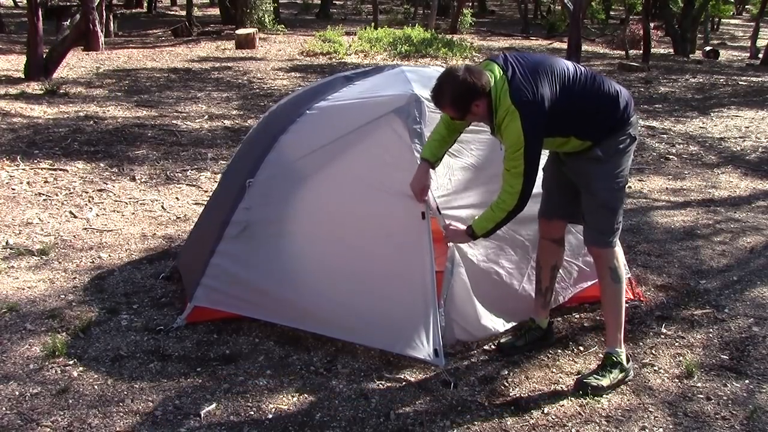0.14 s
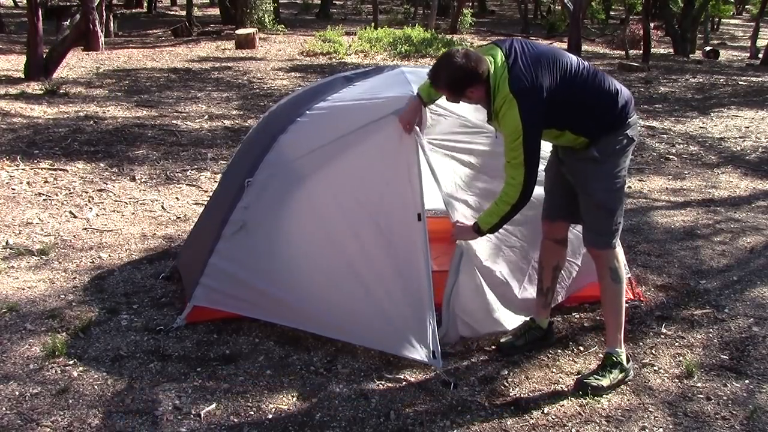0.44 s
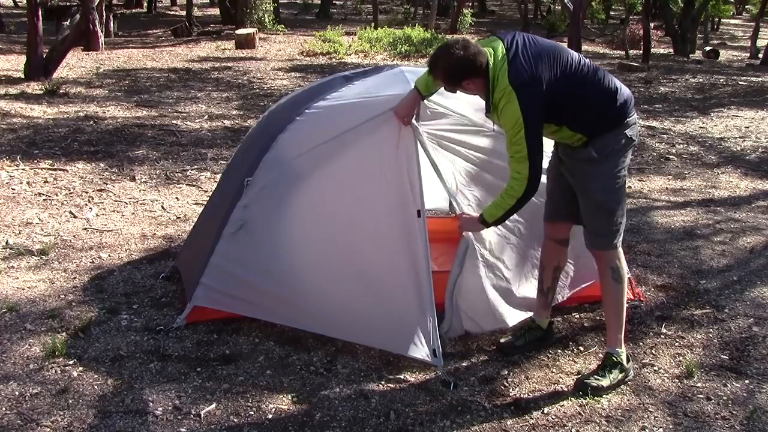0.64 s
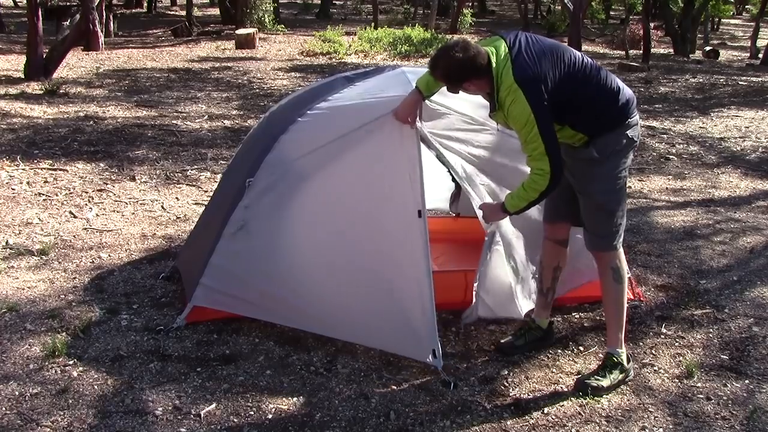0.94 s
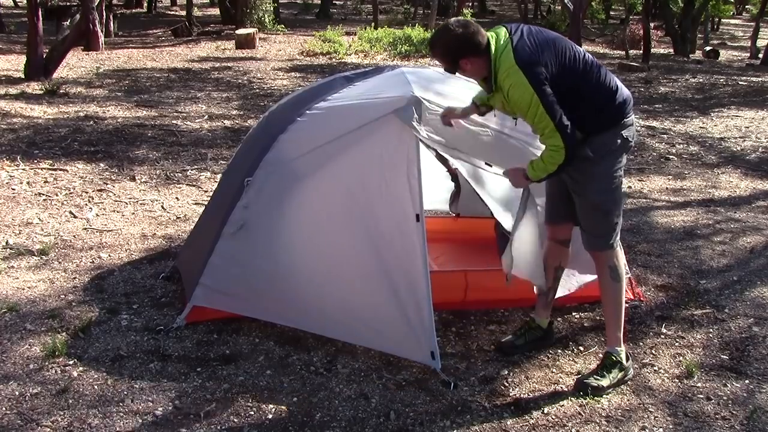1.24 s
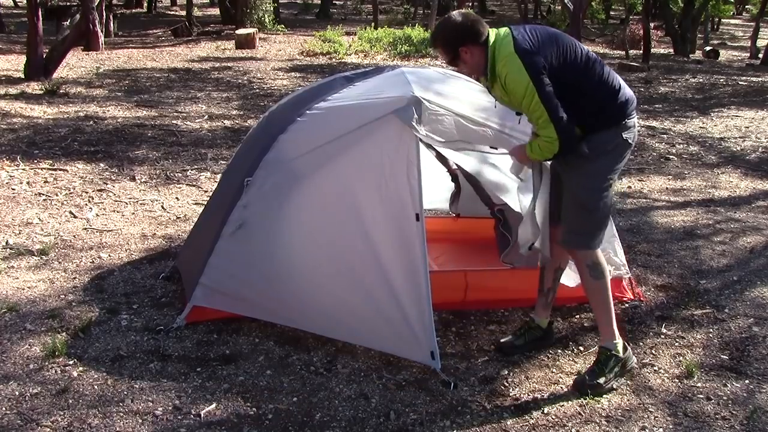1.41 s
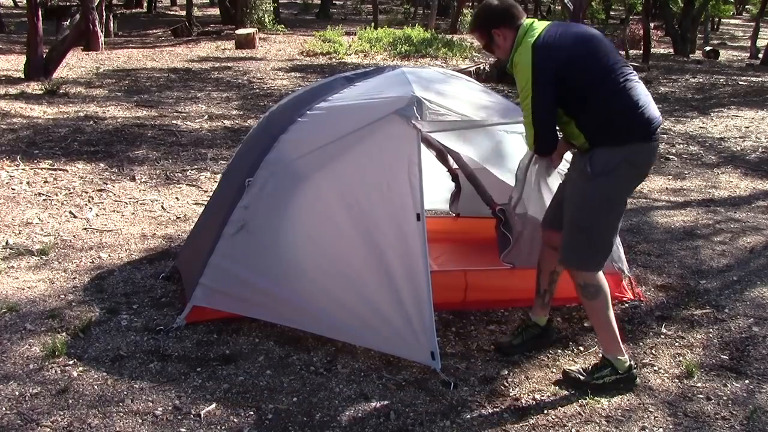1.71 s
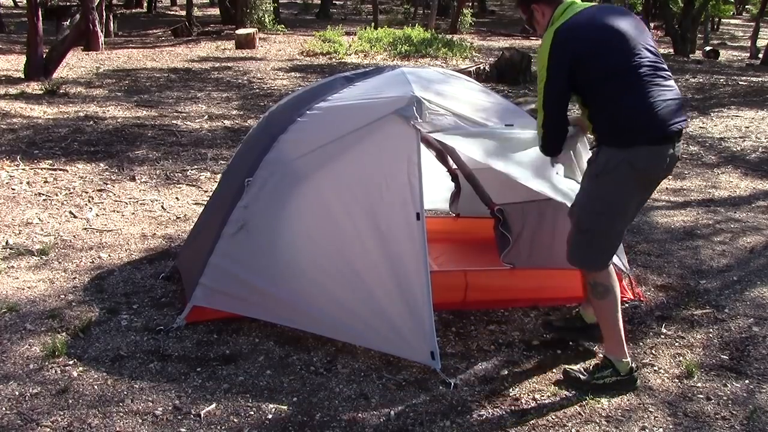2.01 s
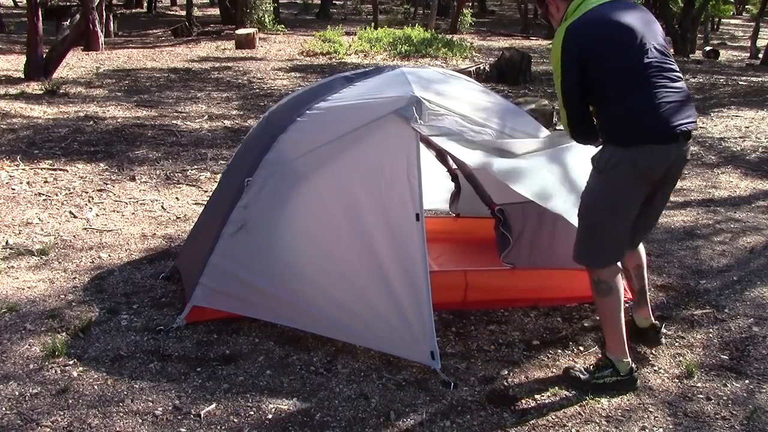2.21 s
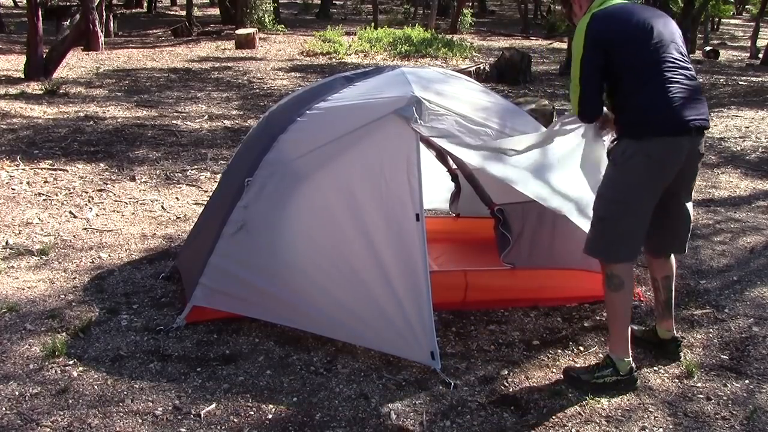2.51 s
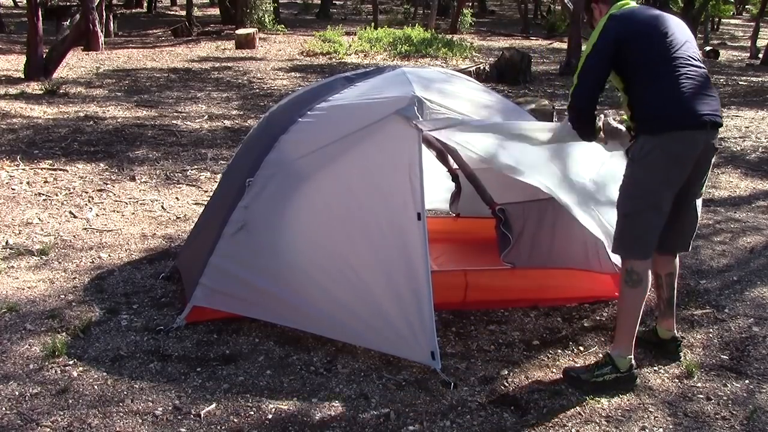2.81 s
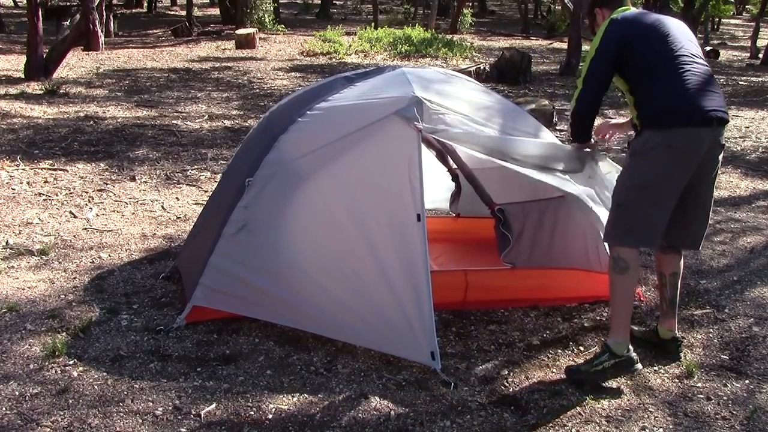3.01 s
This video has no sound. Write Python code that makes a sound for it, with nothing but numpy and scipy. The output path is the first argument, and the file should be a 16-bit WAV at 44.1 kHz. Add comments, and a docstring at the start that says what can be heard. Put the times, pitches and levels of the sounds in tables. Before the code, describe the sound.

A tent zipper opens in one quick pull: faint cloth touches and a small scrape around 0.2 seconds, then a buzzing, toothy zip rising in pitch and wavering until 0.6. Soft nylon rustles and small flaps follow until 1.5. Then the flap is gathered busily, with swishes, crinkles, hard rubs, dull flaps and sharp snaps, loudest from 2 seconds to the end. Quiet outdoor air, slight hiss, dull treble.

```python
"""A tent door is unzipped in one quick pull: the slider scrapes as it starts, then ticks over the teeth, and the
taut panel sings at their rate. The nylon flap is then gathered and folded back; loose cloth swishes, crinkles
and billows. Now and then nylon rubs hard, a pull sets it sliding, a fold flaps taut or a crease snaps.
Still air and faint scatter from the trees surround it. The microphone is dull above 6.6 kHz, over a little hiss."""
import sys
import numpy as np
from scipy import signal
from scipy.fft import rfft, irfft
from scipy.io import wavfile
from scipy.ndimage import uniform_filter1d

SR = 44100
rng = np.random.default_rng(int(sys.argv[2]) if len(sys.argv) > 2 else 0)


def master_out(mix):
    """Clip the mix to full scale and print it as 16-bit PCM to the path in sys.argv[1]."""
    frames = np.transpose(np.atleast_2d(mix))
    ceiling = np.clip(frames, -1, 1)
    pcm = np.round(ceiling * 32767).astype(np.int16)
    wavfile.write(sys.argv[1], SR, pcm)


N = 138915  # samples, 3.15 s


def undb(db):
    """Decibels to gain."""
    return 10 ** (np.asarray(db) / 20)


def unit(x):
    """Scale to rms 1."""
    return x / np.sqrt(np.mean(x ** 2))


def lowpass(x, order, hz):
    """Butterworth filter that dulls the sound above hz."""
    return signal.sosfilt(signal.butter(order, hz, fs=SR, output="sos"), x)


def highpass(x, order, hz):
    """Butterworth filter that thins the sound below hz."""
    return signal.sosfilt(signal.butter(order, hz, "high", fs=SR, output="sos"), x)


def bandpass(x, order, low_hz, high_hz):
    """Butterworth filter that keeps the band between two frequencies."""
    return signal.sosfilt(signal.butter(order, [low_hz, high_hz], "band", fs=SR, output="sos"), x)


def colour(x, points):
    """Causal, minimum-phase filter through (f/Hz, level/dB) points; the result has rms 1."""
    hz, db = np.array(points).T
    size = 2048
    log_f = np.log(np.fft.rfftfreq(size, 1 / SR) + 1)
    log_gain = np.interp(log_f, np.log(hz), db) * np.log(10) / 20
    # fold the cepstrum onto positive time, so nothing rings ahead of the sound
    cepstrum = irfft(log_gain)
    cepstrum[1:size // 2] *= 2
    cepstrum[size // 2 + 1:] = 0
    impulse = irfft(np.exp(rfft(cepstrum)))
    return unit(signal.fftconvolve(x, impulse)[:N])


def envelope(rows, axis, fade_s=0.015):
    """Gain from one dB column of a curve, dying away outside it."""
    rows, t = np.array(rows), np.arange(N) / SR
    outside = np.abs(t - np.clip(t, rows[0, 0], rows[-1, 0]))
    return undb(np.interp(t, rows[:, 0], rows[:, axis])) * np.exp(-outside / fade_s)


def walk(rate):
    """Random wander through `rate` straight-line steps a second, rms 1."""
    knots = rng.standard_normal(N)
    return unit(np.interp(np.arange(N) / SR * rate, np.arange(N), knots))


def grains(rate, spread_db, smooth):
    """Tiny clicks of scattered size, `rate` a second, over a share of smooth friction noise."""
    chance, size, sign = rng.random(N), rng.standard_normal(N), rng.choice([-1, 1], N)
    clicks = (chance < rate / SR) * sign * undb(spread_db * np.clip(size, -2, 2))
    return unit(clicks) + smooth * rng.standard_normal(N)


def burst(start, decay_s):
    """Noise that starts at once and dies away."""
    age = np.arange(N) / SR - start
    fade = np.exp(-np.minimum(np.abs(age) / decay_s, 20))
    return (age >= 0) * fade * rng.standard_normal(N)


# tone colour of the still air: f/Hz, level/dB (relative)
AIR_COLOUR = [(25, -25), (70, -15), (160, 18), (400, -1), (1000, -12), (7000, -15), (15000, 0.5)]
AIR_DB = -55


def still_air():
    """Still air among the trees: steady coloured noise."""
    return undb(AIR_DB) * colour(rng.standard_normal(N), AIR_COLOUR)


WOOD_DELAY_S, WOOD_DECAY_S, WOOD_DB = 0.019, 0.025, -24


def trees(tent):
    """The trees scatter the sound back as a faint, late wash of tiny echoes."""
    echoes = unit(burst(WOOD_DELAY_S, WOOD_DECAY_S)) / np.sqrt(N)  # unit energy
    return undb(WOOD_DB) * signal.fftconvolve(tent, echoes)[:N]


# sizes of crease, as the pitch of each one's tick: f/Hz
CREASE_PITCHES = [700, 1100, 1600, 2200, 3200, 5000]


def creases():
    """Small creases buckle at random, each with a tick at the pitch of its own size."""
    return sum(bandpass(grains(220, 3.5, .4), 2, hz / 1.5, hz * 1.5) for hz in CREASE_PITCHES)


PATCHY_DB, PATCHY_RATE = 2.3, 75  # rms swing of each band; steps per second


def patchy(x):
    """The folds keep changing shape, so each half-octave swells and fades on its own."""
    octave = np.log2(np.fft.rfftfreq(N, 1 / SR) + 1)
    centres = np.arange(9, 13.5, .5)  # log2 Hz: 512 Hz to 8.2 kHz
    spectrum, out = rfft(x), 0
    for weights in np.eye(len(centres)):
        band = irfft(spectrum * np.interp(octave, centres, weights), N)
        out = out + band * undb(PATCHY_DB * walk(PATCHY_RATE))
    return unit(out)


# cloth effort in three stretches, levels before the trims below:
# t/s, swish level/dB, crinkle level/dB, billow level/dB
GRIP_EFFORT = [(0, -50, -60, -68), (.02, -56, -48.5, -54), (.05, -88, -72, -76), (.125, -63, -76, -72),
               (.155, -50.5, -61, -38.5), (.19, -48.5, -67, -30), (.21, -41.5, -48, -31),
               (.265, -38, -30, -34.5)]  # before and into the pull
FOLD_EFFORT = [(0.58, -38, -29, -33.5), (0.66, -35.5, -46, -34), (0.715, -51.5, -43, -44),
               (0.82, -64, -57.5, -55.5), (1.006, -54.5, -46, -47.5), (1.074, -61, -45.5, -33.5),
               (1.105, -69, -56, -48.5), (1.15, -48.5, -43, -45.5), (1.205, -54, -44.5, -40),
               (1.278, -54.5, -44, -48), (1.322, -35, -35, -29), (1.344, -41, -34, -41),
               (1.39, -35.5, -47, -40.5), (1.51, -48.5, -40.5, -45)]  # after the pull
GATHER_EFFORT = [(1.51, -64, -60, -56), (1.528, -31.5, -37, -27), (1.605, -30.5, -32, -32.5),
                 (1.65, -36.5, -33.5, -43), (1.674, -34.5, -29, -35), (1.738, -51, -29.5, -34),
                 (1.76, -36, -25.5, -28), (1.856, -30, -28.5, -31.5), (1.912, -35.5, -32.5, -26.5),
                 (1.938, -30, -25.5, -22.5), (2.026, -28.5, -20.5, -28.5), (2.052, -18, -20.5, -22),
                 (2.09, -24, -21, -27.5), (2.282, -23, -20.5, -26), (2.322, -27.5, -24.5, -32.5),
                 (2.436, -30, -25.5, -41), (2.486, -23, -18.5, -26), (2.578, -26, -27.5, -42),
                 (2.638, -16.5, -19.5, -30), (2.66, -26.5, -25, -30), (2.706, -32, -26, -42.5),
                 (2.742, -24, -17, -21), (2.774, -30.5, -23.5, -23), (2.808, -54, -32, -36),
                 (2.838, -60, -38, -39.5), (2.882, -37.5, -28.5, -37.5), (2.902, -25, -38, -23.5),
                 (2.934, -28.5, -26, -43.5), (3.022, -23.5, -13, -29.5), (3.062, -27, -28, -32.5),
                 (3.108, -55, -28.5, -49), (3.15, -20, -22, -43)]  # the busier handling that follows
# tone colours of the three cloth voices: f/Hz, level/dB (relative)
SWISH_COLOUR = [(500, -31), (1500, -5.5), (3200, -1.5), (5000, -1.5), (6500, 0), (15000, -2.5)]
CRINKLE_COLOUR = [(300, -22.5), (700, -1), (1000, 3), (1300, -2.5), (1900, 4.5), (3000, -4), (6000, -12),
                  (12000, -27)]
BILLOW_COLOUR = [(30, -85), (60, -18), (120, -4), (250, 1), (400, 3.5), (600, -1), (900, -8.5), (1600, -11),
                 (5000, -82)]
SWISH_DB, CRINKLE_DB, BILLOW_DB = 5.5, -6, 0  # trims


def cloth():
    """Nylon slides over itself, small creases buckle and the loose panel billows."""
    after_pull = list(FOLD_EFFORT) + list(GATHER_EFFORT)

    def effort(axis):
        """The stronger of the handling before and after the pull."""
        return np.maximum(envelope(GRIP_EFFORT, axis=axis), envelope(after_pull, axis=axis))

    swish = patchy(colour(grains(3500, 5, .8) * undb(1.6 * walk(180)), SWISH_COLOUR))
    crinkle = patchy(colour(creases() * undb(1.5 * walk(90)), CRINKLE_COLOUR))
    billow = colour(grains(320, 3, .5), BILLOW_COLOUR)
    out = undb(SWISH_DB) * swish * effort(axis=1)
    out = out + undb(CRINKLE_DB) * crinkle * effort(axis=2)
    return out + undb(BILLOW_DB) * billow * effort(axis=3)


# scrapes and hard rubs: the slider scraping as the zip starts (first two rows), later nylon dragged over nylon:
# middle t/s, half length t/s (to 1/e), pitch f/Hz, level/dB at the middle
SCRAPES_AND_RUBS = [(0.17, 0.014, 1460, -38), (0.25, 0.048, 1110, -29), (1.44, 0.087, 990, -38.5),
                    (2.377, 0.049, 3360, -29), (2.473, 0.048, 3800, -23), (2.635, 0.043, 2040, -22.5)]
SCRAPE_WIDTH = .24  # band edges, as a share of the pitch either side


def scrapes_and_rubs():
    """Rough contact, slider or taut nylon, sticks and slips in a short, ringing band of friction noise."""
    t, out = np.arange(N) / SR, 0
    for middle, length, hz, db in SCRAPES_AND_RUBS:
        friction = grains(1500, 4.5, 0.3)
        scrape = unit(bandpass(friction, 2, hz / (1 + SCRAPE_WIDTH), hz * (1 + SCRAPE_WIDTH)))
        out = out + undb(db) * scrape * np.exp(-((t - middle) / length) ** 2)
    return out


# sudden pulls on the cloth: t/s, starting level/dB (before the band filter)
SUDDEN_PULLS = [(0.204, -25), (1.412, -31), (1.523, -23.5), (1.994, -18), (2.887, -14.5)]
TUG_DECAY_S, TUG_LOW_HZ, TUG_HIGH_HZ = 0.04, 150, 2170


def tugs():
    """A sudden pull sets the cloth sliding at once; the rasp then dies away."""
    slide = sum(undb(db) * burst(start, TUG_DECAY_S) for start, db in SUDDEN_PULLS)
    return bandpass(slide, 1, TUG_LOW_HZ, TUG_HIGH_HZ)


# folds flapping taut: t/s at the pulse's middle, peak level/dB of the pulse, pitch f/Hz
TAUT_FOLDS = [(.656, -15, 401), (.668, -24, 450), (.681, -24, 298), (.69, -21.5, 367), (.706, -27, 480),
              (.725, -26, 513), (.771, -29, 460), (.924, -32, 543), (1.041, -25.5, 380), (1.07, -29.5, 480),
              (1.216, -36, 400), (1.295, -22.5, 385), (1.535, -13, 493), (1.677, -18, 404),
              (1.935, -27, 453), (2.047, -7, 233), (2.743, -13.5, 178), (2.777, -5, 430),
              (2.983, -18.5, 268)]
FLUTTER_DECAY_S, FLUTTER_DB = 0.004, -12  # flutter gain relative to the pulse


def flaps():
    """A fold jerks taut: one dull pressure pulse, then a brief flutter."""
    t, out = np.arange(N) / SR, 0
    for middle, db, hz in TAUT_FOLDS:
        u = np.minimum((np.pi * hz * (t - middle)) ** 2, 20)
        pulse = (2 * u - 1) * np.exp(-u)
        flutter = burst(middle, FLUTTER_DECAY_S)
        for _ in range(2):
            flutter = bandpass(flutter, 1, hz / 2, hz * 2)
        flutter = flutter * np.sqrt(SR / hz) / 2  # makes up for the narrower band of a low flap
        out = out + undb(db) * (pulse + undb(FLUTTER_DB) * flutter)
    return out


# creases snapping: t/s, ring level/dB, pitch f/Hz, spray level/dB (relative to the ring, before its filter and lift)
SNAPPING_CREASES = [(0.611, -25.5, 1095, -18), (.893, -38, 1600, -9), (1.123, -35, 1800, -8),
                    (1.158, -26.5, 1160, -16), (1.183, -23.5, 1830, -19), (1.308, -24, 2300, -12),
                    (1.324, -20.5, 1350, 1.5), (1.409, -26, 1040, 1.5), (1.533, -14.5, 2400, -11),
                    (1.62, -15.5, 1410, -12), (1.7, -13, 1940, -12), (1.787, -16.5, 1220, -7),
                    (2.066, -16, 3000, -4), (2.111, -11.5, 1920, -6.5), (2.277, -5.5, 2100, -5.5),
                    (2.416, -9.5, 3990, -25), (2.48, -7, 2660, -10), (2.527, -4, 3070, -12),
                    (2.684, -3, 2020, -26), (2.695, -11, 2000, -6), (2.796, -21.5, 890, 2),
                    (2.855, -25.5, 1050, -10), (2.902, -9.5, 1210, -4), (2.949, -15.5, 2070, -11)]
SNAP_CYCLES, SPRAY_DECAY_S, SPRAY_HZ = .75, .0025, 5000  # ring half length in cycles; spray decay and low-pass


def snaps():
    """A crease pops through: a cycle or two of ring and a short spray of crackle."""
    t, rings, spray = np.arange(N) / SR, 0, 0
    for start, db, hz, spray_db in SNAPPING_CREASES:
        cycles = (t - start) * hz
        swell = np.exp(-np.minimum((cycles / SNAP_CYCLES - 1) ** 2, 20))
        rings = rings + undb(db) * np.sin(2 * np.pi * cycles) * swell
        spray = spray + undb(db + spray_db) * burst(start, SPRAY_DECAY_S)
    return rings + lowpass(2 * spray, 2, SPRAY_HZ)


# the pull: t/s, tooth rate f/Hz, panel tone level/dB, slider level/dB (levels before the trims below)
ZIP_PULL = [(0.208, 388.2, -30, -58), (0.23, 417.5, -25.5, -43), (0.274, 556, -29, -32.5),
            (0.29, 570.5, -20, -32), (0.31, 678, -20.5, -29), (0.346, 636, -19, -28),
            (0.365, 688.5, -27, -29.5), (0.385, 735.4, -17, -28), (0.424, 832, -23.5, -27),
            (0.489, 599, -15.5, -27), (0.498, 596, -16.5, -27), (0.542, 683, -16, -30),
            (0.56, 603, -16.5, -30.5), (0.573, 521, -27, -33), (0.586, 431.6, -57, -41)]
# tone colours of the tooth clicks, the slider's rasp and the shaken tape: f/Hz, level/dB (relative)
TEETH_COLOUR = [(500, -40), (1050, -16), (1550, 9.5), (1900, -7.5), (2350, 2.5), (3200, -17), (6500, -20),
                (12000, -5.5)]
RASP_COLOUR = [(700, -12.5), (1400, 3), (2500, -2), (3500, -2.5), (6300, -1.5), (8500, 8), (10500, 11.5),
               (15000, -10)]
TAPE_COLOUR = [(50, -37), (130, -14.5), (350, -6.5), (600, -1), (1100, -29.5), (3000, -14)]
TONE_DB, TEETH_DB, RASP_DB, TAPE_DB, BUZZ_DB = -0.5, 0.5, 6, 3.5, 1  # trims; the buzz reaches its own at the end
BUZZ_RATIO, BUZZ_JITTER = 3.38, 0.0208  # rough overtone of the slider: multiple of the tooth rate, rms wobble
BUZZ_DB_PER_S = 48  # the buzz grows as the pull goes on
OCTAVE_DB, OCTAVE_POWER = -7.5, 5.3  # second harmonic against the tone at top speed; steepness with speed
TOOTH_JITTER, TOOTH_SCATTER_DB = .034, 3.8  # rms wobble of the rate; rms spread of the force
RASP_CYCLES = .7  # decay of the rasp, in tooth spacings


def zipper():
    """Each tooth clicks, rasps and tugs the panel, which sings at the tooth rate."""
    rows, t = np.array(ZIP_PULL), np.arange(N) / SR
    start, end = rows[0, 0], rows[-1, 0]
    hz = np.interp(t, rows[:, 0], rows[:, 1]) * (1 + TOOTH_JITTER * walk(500))
    teeth = np.cumsum(hz) / SR  # teeth passed so far
    index, phase = teeth.astype(int), teeth % 1
    force = undb(TOOTH_SCATTER_DB * rng.standard_normal(N))[index]  # one force per tooth

    speed = hz / hz.max()
    octave = undb(OCTAVE_DB) * speed ** OCTAVE_POWER * np.sin(4 * np.pi * teeth)
    octave = octave * undb(4.5 * walk(130))
    tone = unit((np.sin(2 * np.pi * teeth) + octave) * undb(2.8 * walk(250)))

    clicks = colour(np.diff(index, prepend=0) * force, TEETH_COLOUR)
    rasp = colour(force * np.exp(-phase / RASP_CYCLES) * rng.standard_normal(N), RASP_COLOUR)
    tape = colour(grains(540, 1.7, 1.0), TAPE_COLOUR)
    buzz_hz = BUZZ_RATIO * hz * (1 + BUZZ_JITTER * walk(900))
    buzz = unit(np.sin(2 * np.pi * np.cumsum(buzz_hz) / SR) * force)
    buzz = buzz * undb(BUZZ_DB_PER_S * (np.clip(t, start, end) - end))

    slider = undb(BUZZ_DB) * buzz + undb(TEETH_DB) * clicks
    slider = slider + undb(RASP_DB) * rasp + undb(TAPE_DB) * tape
    panel = undb(TONE_DB) * tone * envelope(ZIP_PULL, axis=2, fade_s=.004)
    return panel + slider * envelope(ZIP_PULL, axis=3, fade_s=.004)


def scene():
    """The tent, faintly scattered by the trees, over still air."""
    tent = cloth() + scrapes_and_rubs() + tugs() + flaps() + snaps() + zipper()
    return (still_air() + trees(tent) + tent)[None]


# tone colour of the recorder hiss: f/Hz, level/dB (relative)
HISS_COLOUR = [(100, 7.5), (10000, -9), (15000, -15)]
MIC_HZ, MIC_LOW_HZ, TOP_HZ = 6604, 54, 15650  # dull above, thin below, and the steep upper limit
HISS_DB = -63.5  # before the last two filters
OPEN_DB, OPEN_POWER, TOP_DB = -15.5, 0.96, -20  # treble level that fully opens the top, steepness, gain when open


def record(dry):
    """The recorder trims the rumble and shuts off the top, opening it a little for loud treble."""
    dull = lowpass(dry, 14, MIC_HZ)
    treble = highpass(dull, 2, 3000)
    loudness = np.sqrt(np.abs(uniform_filter1d(treble ** 2, size=500)))  # rms over 11 ms
    opening = np.minimum(loudness / undb(OPEN_DB), 1) ** OPEN_POWER
    top = highpass(dry, 6, 9300)
    hiss = undb(HISS_DB) * colour(rng.standard_normal(N), HISS_COLOUR)
    x = highpass(dull + undb(TOP_DB) * opening * top + hiss, 2, MIC_LOW_HZ)
    return signal.sosfilt(signal.ellip(10, .2, 80, TOP_HZ, fs=SR, output="sos"), x)


dry = scene()
out = record(dry)
master_out(out)
```